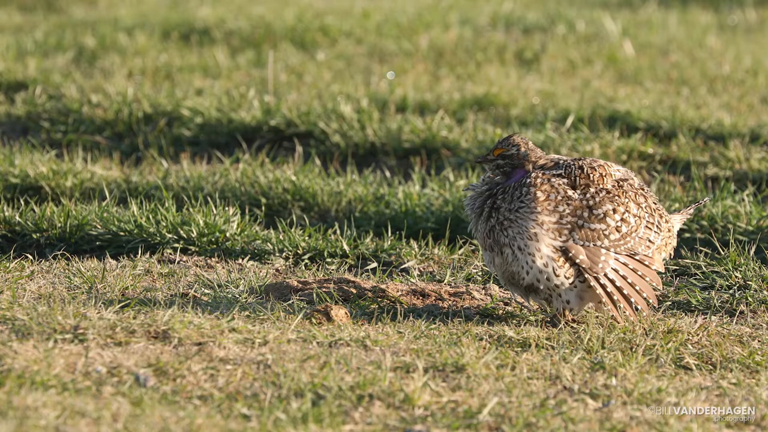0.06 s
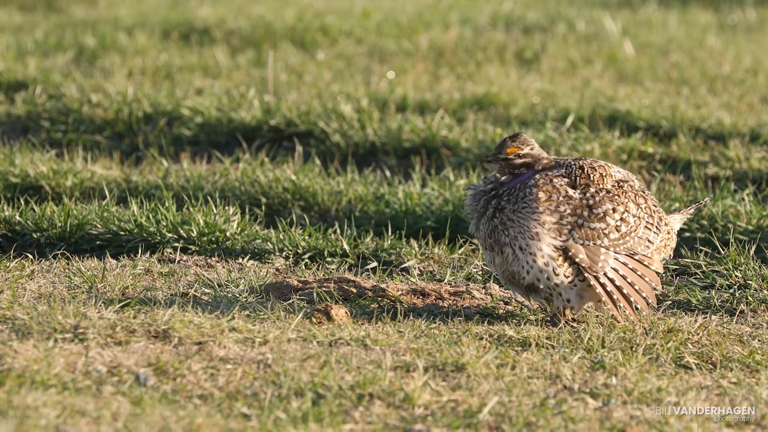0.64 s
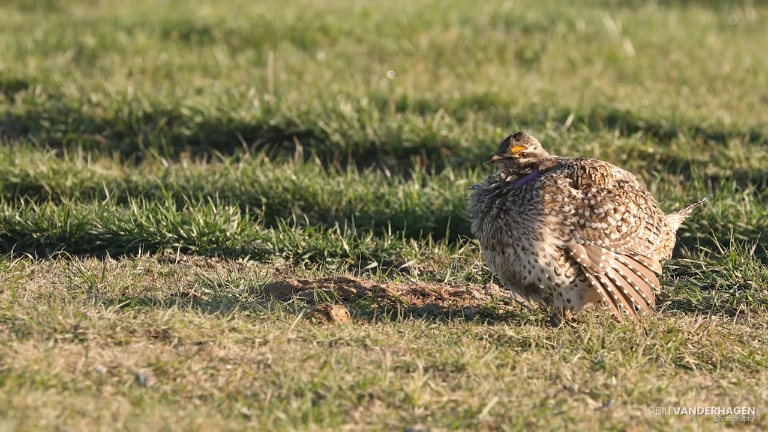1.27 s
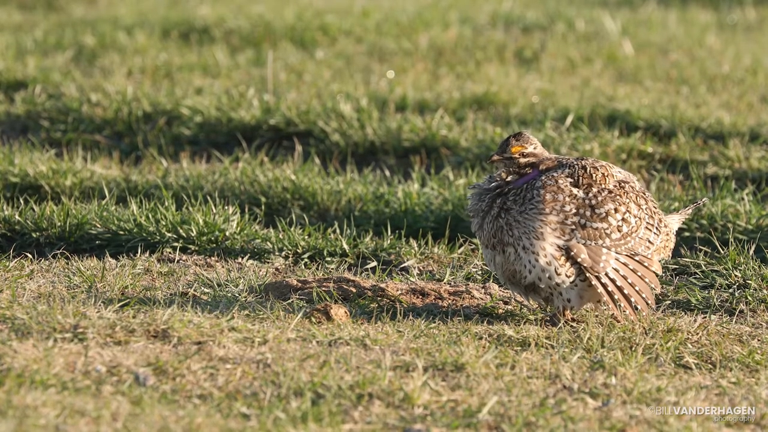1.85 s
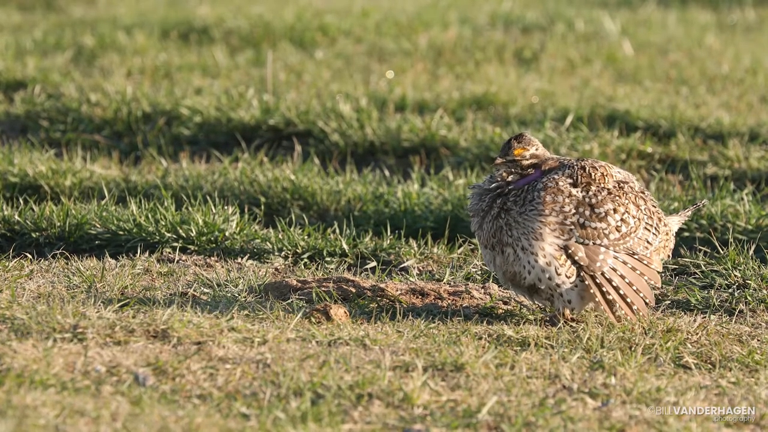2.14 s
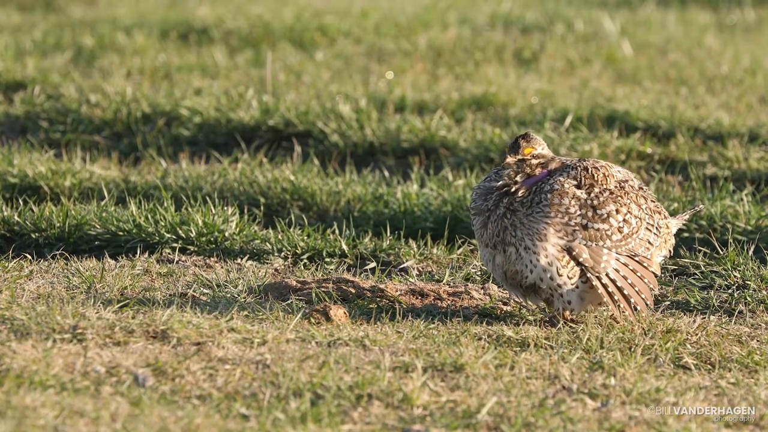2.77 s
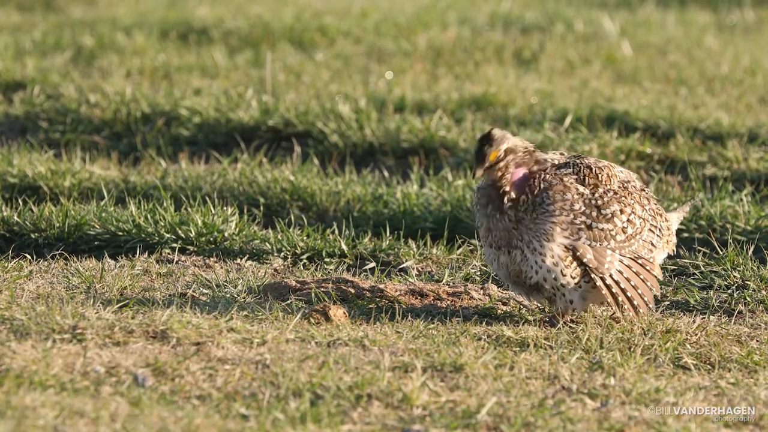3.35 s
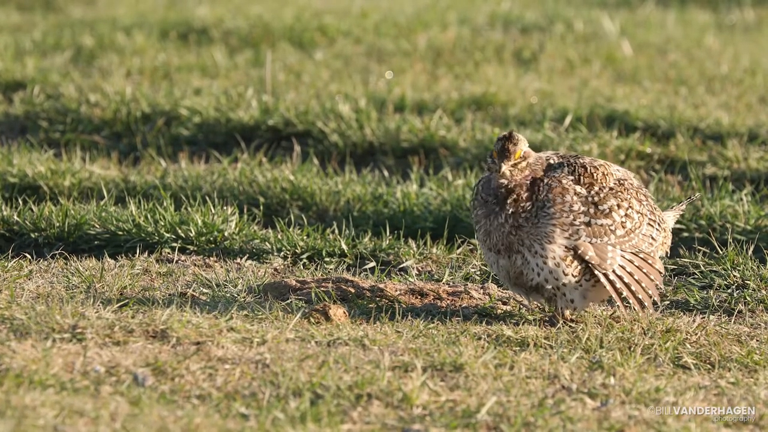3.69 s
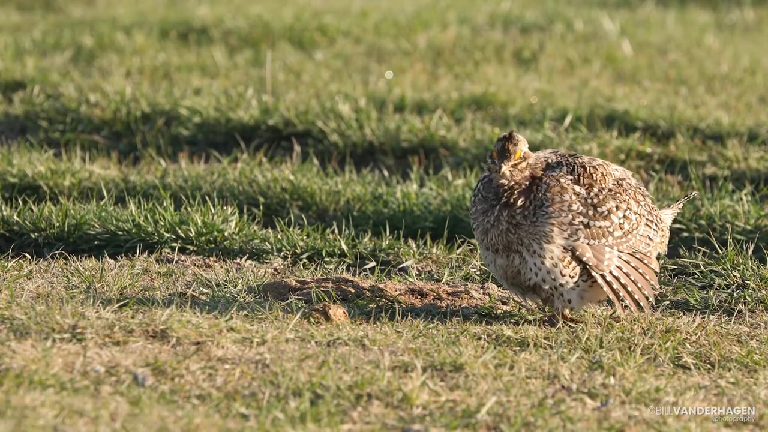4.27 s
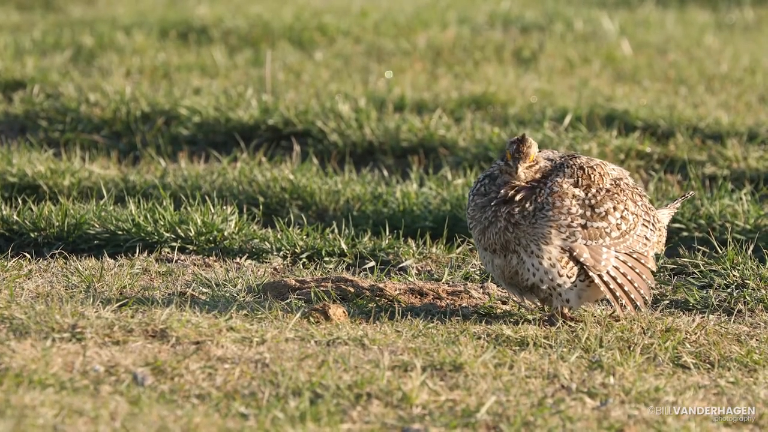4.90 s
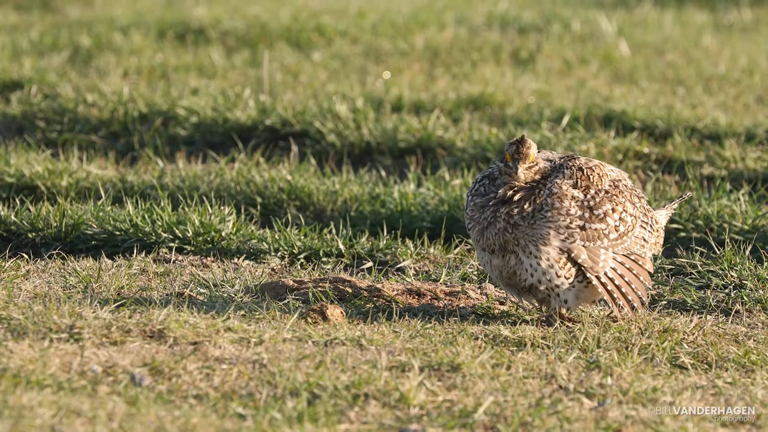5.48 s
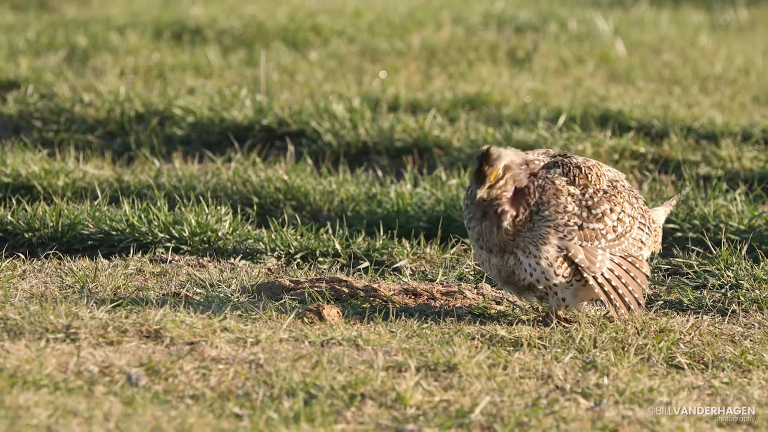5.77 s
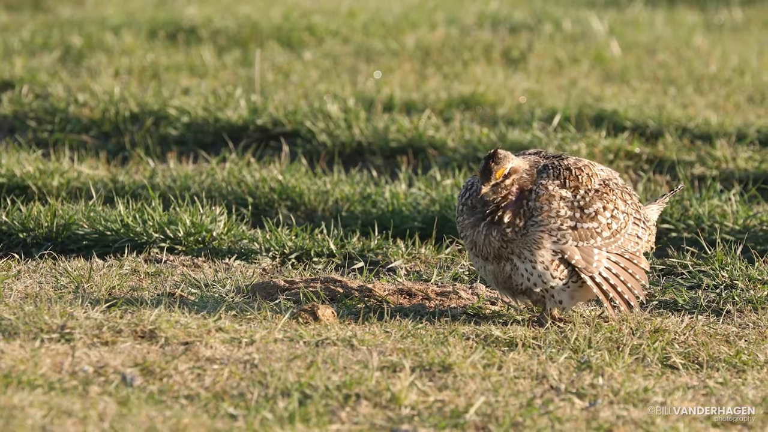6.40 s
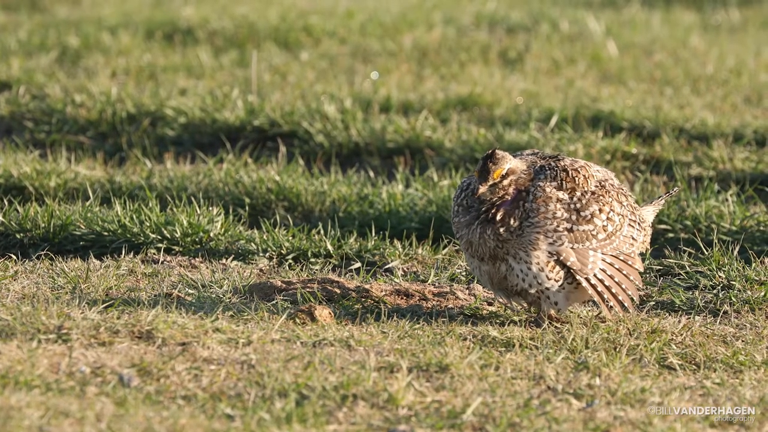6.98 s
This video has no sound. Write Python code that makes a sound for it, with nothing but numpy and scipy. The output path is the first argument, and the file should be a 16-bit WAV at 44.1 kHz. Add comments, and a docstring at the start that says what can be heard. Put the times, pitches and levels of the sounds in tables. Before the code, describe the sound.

On open prairie, light wind bumps and rumbles on the microphone while faint birds whistle in the distance. About halfway through, a puffed-up grouse gives two short, rattling gobbles, the second softer, as a lark calls from further off. Then a lark close to the microphone sings one loud, fluting phrase, overlapping a third gobble. A quiet hush of air lies underneath.

```python
"""Grouse lek at low sun

Open prairie. A puffed-up grouse gobbles three times, its air sacs booming under a rattling throat.
A lark calls from further off, then another close to the microphone sings one fluting phrase, the two
sides of its syrinx taking turns. More birds whistle in the distance. Light wind buffets the
microphone with eddies and gusts, over a quiet hush."""
import sys
import numpy as np
from scipy import signal
from scipy.fft import rfft, irfft
from scipy.io import wavfile
from scipy.ndimage import uniform_filter1d

SR = 44100
rng = np.random.default_rng(int(sys.argv[2]) if len(sys.argv) > 2 else 0)


def store_pcm(level_fs):
    """Save levels as 16-bit WAV."""
    pcm = np.round(np.clip(level_fs, -1, 1) * 32767).astype(np.int16)
    wavfile.write(sys.argv[1], SR, np.atleast_2d(pcm).T)


N = 310464
TIME = np.arange(N) / SR

# the grouse's gobbles: t/s, time stretch, pitch ratio, throat resonance ratio,
# syllable gain/dB, coo gain/dB, squeak gain/dB
GOBBLES = [(3.279, 0.99, 1.02, 0.93, -1.5, 1, 2), (4.262, 1.27, 1.15, 0.83, -7.5, -27, -27),
           (5.706, .975, 1.0, .98, 1, -2.5, 5)]
# syllables of a gobble, before GOBBLES scales them: t/s into it, length/s, start f/Hz, end f/Hz,
# throat resonance f/Hz, air sac level/dB, throat level/dB, roughness 0-1
SYLLABLES = [(0, 0.0664, 398.4, 306.7, 1067, -52, -46.5, 0.31),
             (.1, .034, 433.6, 412, 870, -52.5, -47, 0.28), (.122, .042, 320, 470, 674, -42.5, -53, 0.13),
             (.153, 0.045, 434.3, 415, 740, -47, -46, .35)]
# its two closing coos, scaled likewise: t/s into it, length/s, f/Hz, air sac level/dB
COOS = [(0.228, 0.022, 357, -48.5), (0.276, 0.023, 429, -39)]
# its hissy squeaks, time and level scaled likewise: t/s into it, half length/s, level/dB, top f/Hz
SQUEAKS = [(-.01, 0.0053, -65, 6830), (0.018, 0.0068, -61.5, 6960), (0.101, .0035, -56.5, 7600),
           (.143, 0.0072, -64.5, 8870)]
# notes of both larks: t/s, length/s, start f/Hz, end f/Hz, bend (1 glides evenly, more settles early),
# level/dB, loudest point 0-1, rasp 0-1
LARK_NOTES = [(3.235, 0.053, 2490, 2270, 0.77, -46.5, 0.48, 0.37),
              (3.352, 0.13, 2810, 2454, 0.93, -42, 0.69, 0.03),
              (3.717, 0.096, 1870, 1630, 1.32, -50, 0.26, 0.15),
              (4.118, 0.033, 2750, 2635, 1.07, -51, 0.7, 0.53),
              (4.138, 0.051, 1846, 1810, 2.3, -51.5, .5, 0.08),
              (4.167, 0.046, 2437, 2300, 1, -48.5, .45, 0.42),
              (5.078, 0.14, 2470, 2255, 5.3, -32.5, 0.25, 0), (5.209, 0.026, 2262, 2250, 1, -44, .3, 0.04),
              (5.257, .036, 2422, 2262, 1.03, -27.5, 0.77, 0), (5.283, .078, 2262, 1884, 3.5, -40, 0, 0.15),
              (5.433, 0.046, 3032, 2950, 0.9, -29, 0.7, 0), (5.479, 0.055, 2925, 2778, 1.13, -25, 0.47, 0),
              (5.549, 0.037, 2940, 2673, 0.75, -26.5, 0.68, 0),
              (5.593, 0.1, 4103, 4145, 3.2, -45.5, 0.4, 0.03),
              (5.747, 0.024, 6400, 6200, 0.74, -49.5, 0.7, 0.39),
              (5.772, 0.029, 4690, 4560, 0.96, -38.5, .3, 0.17),
              (5.793, .082, 4065, 1838, 1.7, -28.5, 0.44, 0.31),
              (5.875, .066, 3386, 3217, 2.46, -38, 0.32, 0.05),
              (5.975, 0.031, 2868, 2838, 1.04, -32.5, 0.46, 0.41),
              (5.998, 0.037, 2282, 2283, 0.85, -31.5, 0.64, 0.24),
              (6.03, 0.04, 2280, 2270, 0.88, -42, 0.74, 0.04), (6.04, 0.044, 4060, 3590, 1, -48.5, .6, .4),
              (6.052, .02, 2744, 2517, 1.5, -36.5, 0.25, 0.9),
              (6.076, 0.068, 4386, 4304, 1.3, -42.5, 0.4, 0.03),
              (6.21, 0.046, 1810, 1594, 1, -46.5, .6, .4), (6.252, .037, 1856, 2703, 2.2, -31, .62, 0.46),
              (6.283, .15, 1906, 1804, 5.5, -30, 0.19, 0)]
# course of the further lark's "tsee-ew": t/s into the call, f/Hz, level/dB, rasp 0-1
TSEE_EW = [(0, 2400, -64, .7), (.007, 3890, -60, 0.74), (.013, 5150, -74, 0.65), (0.022, 3680, -57.5, 0.1),
           (0.039, 3506, -51, 0), (.074, 3320, -50.5, 0.23), (.095, 2590, -46, .3),
           (0.109, 2214, -53.5, .3), (.121, 1820, -54, .2), (.132, 1690, -74, .2)]
# starts of that call: t/s
TSEE_EW_STARTS = [3.536, 3.891]
# distant slurred whistles: t/s, length/s, start f/Hz, end f/Hz, level/dB before the gain in scene()
FAR_WHISTLES = [(0.125, 0.033, 2900, 2480, -60), (0.235, 0.11, 1880, 1823, -69.5),
                (0.44, 0.07, 2760, 2757, -70), (0.717, 0.055, 2710, 2380, -66.5),
                (0.786, 0.078, 3380, 3080, -70), (1.044, 0.072, 2900, 1987, -65),
                (1.144, 0.064, 2534, 2460, -64.5), (1.204, 0.07, 2020, 1813, -63),
                (1.286, 0.061, 2650, 2500, -65), (1.297, 0.19, 2373, 2157, -66.5),
                (1.421, 0.067, 3410, 3160, -69), (1.514, 0.08, 3020, 2016, -63),
                (1.655, 0.035, 1856, 1817, -65.5), (1.67, 0.16, 2920, 2720, -75),
                (1.869, 0.16, 1878, 1880, -72.5), (1.98, 0.22, 12100, 11100, -82),
                (1.989, 0.046, 3400, 2220, -68), (2.292, 0.095, 3120, 3050, -74),
                (2.506, 0.054, 3500, 3300, -76.5), (2.852, 0.034, 2160, 2160, -63.5),
                (2.972, 0.12, 1998, 1819, -51.5), (3.044, 0.038, 3280, 2920, -69.5),
                (3.108, 0.28, 2020, 1904, -65), (4.181, 0.14, 1967, 1953, -65.5),
                (4.502, 0.19, 2636, 2450, -68), (4.782, 0.06, 3380, 2250, -70),
                (4.829, 0.14, 2610, 2550, -73), (5.644, 0.037, 2880, 2670, -57.5)]
# strongest eddies on the microphone: t/s, peak level/dB
EDDIES = [(0.082, -33.5), (0.172, -29.5), (0.211, -29.5), (0.337, -32), (0.481, -41), (0.785, -33.5),
          (1.16, -32), (1.184, -24.5), (1.207, -31.5), (1.482, -41), (2.379, -23.5), (2.444, -30),
          (2.64, -29), (2.652, -31.5), (2.713, -23), (2.851, -29.5), (2.887, -24.5), (3.107, -32),
          (3.244, -33.5), (3.708, -39.5), (3.902, -33.5), (3.95, -34.5), (6.595, -38)]
# gusts around them: start t/s, end t/s, nominal level/dB
GUSTS = [(0.046, 0.463, -43), (0.778, 0.815, -31.5), (1.123, 1.223, -36.5), (2.372, 2.52, -37),
         (2.607, 3.001, -37), (3.03, 3.356, -44), (3.357, 3.674, -50), (3.696, 3.99, -41),
         (6.452, 6.501, -50.5), (6.557, 6.69, -46)]
# spectrum of the gusts' rumble: f/Hz, relative level/dB
GUST_SPECTRUM = [(20, -9), (85, 2.5), (150, -5.5), (250, -12.5), (400, -31.5), (1200, -88)]
# spectrum of still air over the grass: f/Hz, relative level/dB
AIR_SPECTRUM = [(20, -4), (130, 0.5), (250, -6.5), (700, -7.5), (1000, -10), (1700, -19), (3700, -70.5)]
# spectrum of the microphone hiss: f/Hz, relative level/dB
HISS_SPECTRUM = [(700, -22), (1400, -8.5), (2000, -5.5), (2700, -9.5), (5300, -21), (7000, -19),
                 (8600, -22.5), (10800, -15), (15500, -20)]
# swell of a faint far drone: t/s, level/dB
DRONE_LEVELS = [(0, -89), (.9, -76), (1.6, -67.5), (2.6, -72.5), (7, -71.5)]
# echoes off the ground and rises: delay/s, level/dB
GROUND_ECHOES = [(.0075, -18), (.021, -18), (0.031, -28)]


def grouse_gobbles(half_tone_db=-4.0, throat_fall_octaves=0.64, sag_db=10):
    """Air sacs boom on the fundamental; overtones and half tones pass a sinking throat resonance."""
    out, jitter, shake = np.zeros(N), wobble(120), wobble(193)
    halves = np.arange(3, 12)[:, None]  # partials, in halves of the pitch
    for s, length, start_hz, end_hz, throat_hz, sac_db, throat_db, rough in gobble_syllables():
        on, along = stretch(s, length)
        pitch = start_hz + (end_hz - start_hz) * along
        phase = phase_of(pitch * (1 + 0.1 * rough * jitter[on]))
        centre_hz = throat_hz * 2 ** (throat_fall_octaves * (.5 - along))
        weights = resonance(halves / 2 * pitch, centre_hz, width_hz=690) ** 2
        weights *= from_db(half_tone_db * (halves % 2))
        throat = np.sum(weights * np.sin(halves / 2 * phase), axis=0) / np.linalg.norm(weights, axis=0)
        rattle = (1 + 1.65 * rough * shake[on]) / np.sqrt(1 + rough ** 2)
        swell = from_db(-sag_db * abs(along - .5))
        gain = np.sqrt(2) * rattle * swell * envelope(along, length, attack_s=0.006, release_s=0.012)
        out[on] += gain * (from_db(sac_db) * np.sin(phase) + from_db(throat_db) * throat)
    return out


def gobble_syllables(coo_throat_db=-69, coo_rough=0.14):
    """Every gobble runs through the same syllables and coos at its own pace: rows as in SYLLABLES."""
    for s, slow, ratio, throat_ratio, gain_db, coo_db, _ in GOBBLES:
        for after, length, start_hz, end_hz, throat_hz, sac_db, throat_db, rough in SYLLABLES:
            yield (s + slow * after, slow * length, ratio * start_hz, ratio * end_hz,
                   throat_ratio * throat_hz, sac_db + gain_db, throat_db + gain_db, rough)
        for after, length, hz, sac_db in COOS:
            yield (s + slow * after, slow * length, ratio * hz, ratio * hz,
                   2 * hz, sac_db + coo_db, coo_throat_db + coo_db, coo_rough)


def grouse_squeaks():
    """Brief jets of air: an unsteady whistle that arches in pitch, with a pulsing hiss around it."""
    hiss = shaped_noise(lambda hz: resonance(hz, centre_hz=9600, width_hz=7000) ** 3 * (hz > 4500))
    hiss *= from_db(-4) * (1 + .5 * wobble(300))
    out, unsteady = np.zeros(N), wobble(1500)
    for s, slow, *_, gain_db in GOBBLES:
        for after, half_s, db, hz in SQUEAKS:
            on, bump = bell_curve(s + slow * after, half_s, reach=4)
            whistle = np.sin(phase_of(hz * (1 + 0.033 * (bump - 1) + 0.016 * unsteady[on])))
            out[on] += from_db(db + gain_db) * bump * (whistle + hiss[on])
    return out


def lark(notes, buzz_hz, depth, flutter_db, sag_db=5, slur_db_per_octave=24):
    """The two sides of the syrinx take turns; each note glides, swells to its loudest point and sags."""
    out = np.zeros(N)
    for side in range(2):
        hz, gain, rasp = np.zeros((3, N))
        for s, length, start_hz, end_hz, bend, db, loudest, note_rasp in notes[side::2]:
            on, along = stretch(s, length)
            hz[on] = end_hz + (start_hz - end_hz) * (1 - along) ** bend
            octaves_off = abs(np.log2(hz[on] / np.interp(loudest, along, hz[on])))
            loss_db = sag_db * abs(along - loudest) + slur_db_per_octave * octaves_off
            gain[on] = from_db(db - loss_db) * envelope(along, length, attack_s=0.015, release_s=0.013)
            rasp[on] = note_rasp
        out += gain * syrinx(hz, rasp, buzz_hz, depth, flutter_db, overtone_db=-46)
    return out


def syrinx(hz, rasp, buzz_hz, depth, flutter_db, overtone_db, rasp_brightens_db=16):
    """A nearly pure whistle; in rasping notes pitch and strength shake quickly and unevenly."""
    buzz = np.sin(phase_of(buzz_hz * (1 + 0.22 * wobble(40))))
    phase = phase_of(hz * (1 + depth * rasp * (buzz + wobble(500)) + 0.002 * wobble(67)))
    shake = from_db(flutter_db * np.sqrt(np.clip(rasp, 0, 1)) * (np.tanh(wobble(180)) - rasp / 2))
    mid_range = np.interp(hz, [1900, 2200, 3400, 3800], [0, 1, 1, 0])
    overtones = np.sin(2 * phase) + .6 * mid_range * (np.sin(3 * phase) + np.sin(4 * phase))
    brightness = from_db(overtone_db + rasp_brightens_db * rasp)
    return np.sqrt(2) * shake * (np.sin(phase) + brightness * overtones)


def lark_tsee_ews():
    """The further lark gives the same call twice: a flick up, a held whistle, a rasping fall."""
    after, call_hz, call_db, call_rasp = np.transpose(TSEE_EW)
    hz, gain, rasp = np.zeros((3, N))
    for s in TSEE_EW_STARTS:
        on, _ = stretch(s, after[-1])
        for track, course in (hz, call_hz), (gain, from_db(call_db)), (rasp, call_rasp):
            track[on] = np.interp(TIME[on] - s, after, course)
    return gain * syrinx(hz, rasp, buzz_hz=140, depth=0.071, flutter_db=11, overtone_db=-50)


def far_birds(whistles, count=3):
    """A few distant birds take turns at whistles that fall and level off; the air makes them waver."""
    out = np.zeros(N)
    for bird in range(count):
        hz, gain, rasp = np.zeros((3, N))
        for s, length, start_hz, end_hz, db in whistles[bird::count]:
            on, along = stretch(s, length)
            hz[on] = end_hz + (start_hz - end_hz) * (1 - along) ** 2.3
            gain[on] = from_db(db) * np.sin(np.pi * along) ** 0.5
            rasp[on] = np.tanh(((start_hz - end_hz) / length / 8000) ** 2) / 2  # steep slurs rasp
        gain *= from_db(2.13 * wobble(30))
        out += gain * syrinx(hz, rasp, buzz_hz=138.3, depth=0.06, flutter_db=7.5, overtone_db=-43)
    return out


def chorus_whistles(count=18, from_s=.7, until_s=3.3, length_s=.1, db=-77.5):
    """Still further birds give faint slurs at random until the larks begin: rows as in FAR_WHISTLES."""
    late, pitch = rng.random((count, 2)).T
    start_hz = 2000 * 1.75 ** pitch
    times = from_s + (np.arange(count) + late) / count * (until_s - from_s)
    return [(s, length_s, hz, .94 * hz, db) for s, hz in zip(times, start_hz)]


def wind_on_microphone():
    """Each eddy swings the pressure once or twice, unevenly; gusts rumble around them."""
    out, uneven = np.zeros(N), np.tanh(wobble(212))
    turns = rng.random(size=300)
    for (s, db), turn in zip(EDDIES + small_eddies(), turns):
        hz = 116 * from_db(0.25 * (db + 31.5))  # strong eddies pass faster
        on, bump = bell_curve(s, half_s=0.621 / hz, reach=5)
        swing = np.sin(phase_of(hz * (1 + 0.59 * uneven[on])) + 2 * np.pi * turn)
        out[on] += np.sqrt(2) * from_db(db) * bump * swing
    flow = sum(from_db(db) * ((TIME > start) & (TIME < end)) for start, end, db in GUSTS)
    flow = uniform_filter1d(flow, size=1000)
    out += flow * from_db(8 * np.tanh(wobble(18)) - 5) * coloured(GUST_SPECTRUM)
    # the slowest pressure swings, below about 35 Hz, are taken out
    return signal.sosfilt(signal.butter(2, 35, "high", fs=SR, output="sos"), out)


def small_eddies(per_s=14, slot_s=1 / 40, over_gust_db=0.5, spread_db=8):
    """Smaller eddies come at random inside each gust and grow with it: rows as in EDDIES."""
    slots = np.arange(0, TIME[-1], slot_s)
    chance, late, size = rng.random((len(slots), 3)).T
    return [(s + late[k] * slot_s, gust_db + over_gust_db + spread_db * (size[k] - .5))
            for start, end, gust_db in GUSTS for k, s in enumerate(slots)
            if start < s < end - slot_s and chance[k] < per_s * slot_s]


def hush():
    """Still air over the grass, microphone hiss, a faint far drone and a faint far trill."""
    air = from_db(-62) * coloured(AIR_SPECTRUM)
    hiss = from_db(-65) * coloured(HISS_SPECTRUM)
    drone = shaped_noise(lambda hz: resonance(hz, centre_hz=938, width_hz=170))
    drone *= from_db(np.interp(TIME, *np.transpose(DRONE_LEVELS)))
    trill = shaped_noise(lambda hz: resonance(hz, centre_hz=4060, width_hz=170))
    throb = (.5 + .5 * np.sin(phase_of(23.5 + wobble(2)))) ** 2
    return air + hiss + drone + from_db(-78) * throb * trill


def prairie(direct, scatter_db, t60_s):
    """A call reaches the microphone with a few weak echoes and a short scatter off the grass."""
    t = TIME[:SR // 2]
    tail = rng.standard_normal(len(t)) * from_db(-60 * t / t60_s) * (1 - np.exp(-t / 0.011))
    scatter = signal.fftconvolve(direct, tail / np.linalg.norm(tail))[:N]
    echoes = sum(from_db(db) * np.interp(TIME - s, TIME, direct, left=0) for s, db in GROUND_ECHOES)
    return direct + echoes + from_db(scatter_db) * scatter


def from_db(db):
    """Decibels to gain."""
    return 10 ** (np.asarray(db) / 20)


def shaped_noise(gain_at):
    """Noise of rms 1 with the given relative gain at each frequency."""
    hz = np.arange(N // 2 + 1) * SR / N + 1e-6
    noise = irfft(rfft(rng.standard_normal(N)) * gain_at(hz), N)
    return noise / np.sqrt(np.mean(noise ** 2) + 1e-20)


def coloured(spectrum):
    """Noise whose spectrum joins the points on a log-frequency axis."""
    at, db = np.transpose(spectrum)
    return shaped_noise(lambda hz: from_db(np.interp(np.log(hz), np.log(at), db)))


def wobble(rate_hz):
    """Random motion up to a rate, spread 1."""
    return shaped_noise(lambda hz: 1 / (1 + (hz / rate_hz) ** 4))


def resonance(hz, centre_hz, width_hz):
    """Gain of a resonance, 1 on top."""
    return 1 / (1 + (2 * (hz - centre_hz) / width_hz) ** 2)


def phase_of(hz):
    """Running phase of a gliding pitch."""
    return 2 * np.pi * np.cumsum(hz) / SR


def stretch(s, length):
    """The samples of an event, and how far along it each lies (0-1)."""
    on = np.flatnonzero((TIME > s) & (TIME < s + length))
    return on, (TIME[on] - s) / length


def bell_curve(s, half_s, reach):
    """The samples within reach half lengths of a moment, and a Gaussian swell over them."""
    on = abs(TIME - s) < reach * half_s
    return on, np.exp(-.5 * ((TIME[on] - s) / half_s) ** 2)


def envelope(along, length, attack_s, release_s):
    """Smooth attack, hold, smooth release."""
    rise, fall = np.clip([along * length / attack_s, (1 - along) * length / release_s], 0, 1)
    return np.sin(np.pi / 2 * rise) ** 2 * np.sin(np.pi / 2 * fall)


def scene():
    """One microphone on the lek: the grouse, songbirds at three distances, wind and hush."""
    handover_s = 5.0  # the further lark sings first, then the near one takes over
    near = lark([n for n in LARK_NOTES if n[0] >= handover_s], buzz_hz=150, depth=0.093, flutter_db=8.5)
    further = lark([n for n in LARK_NOTES if n[0] < handover_s], buzz_hz=140, depth=.07, flutter_db=8)
    grouse = grouse_gobbles() + grouse_squeaks()
    birds = prairie(near, scatter_db=-17, t60_s=.15)
    birds += prairie(further + lark_tsee_ews(), scatter_db=-11, t60_s=.13)
    distant = far_birds(FAR_WHISTLES) + far_birds(chorus_whistles())
    birds += from_db(5.0) * prairie(distant, scatter_db=-11.5, t60_s=0.39)
    birds += prairie(grouse, scatter_db=-9, t60_s=.2)
    return (birds + wind_on_microphone() + hush())[None]


def record(dry):
    """The top of the treble is cut steeply."""
    cutoff_hz = 15720
    return signal.sosfilt(signal.ellip(12, .1, 70, cutoff_hz, fs=SR, output="sos"), dry)


dry = scene()
out = record(dry)
store_pcm(out)
```